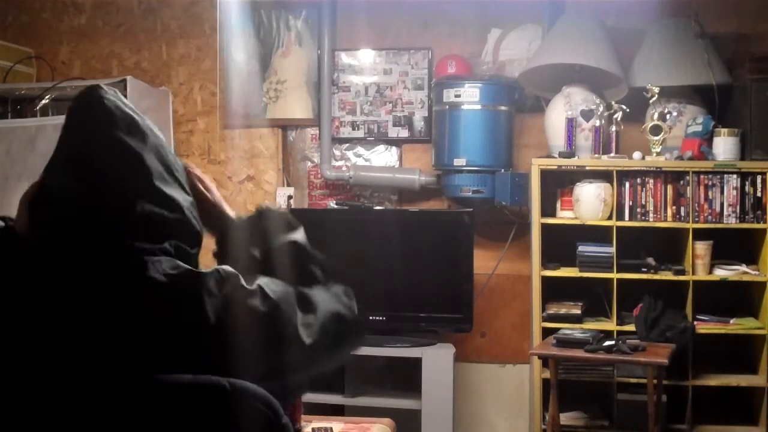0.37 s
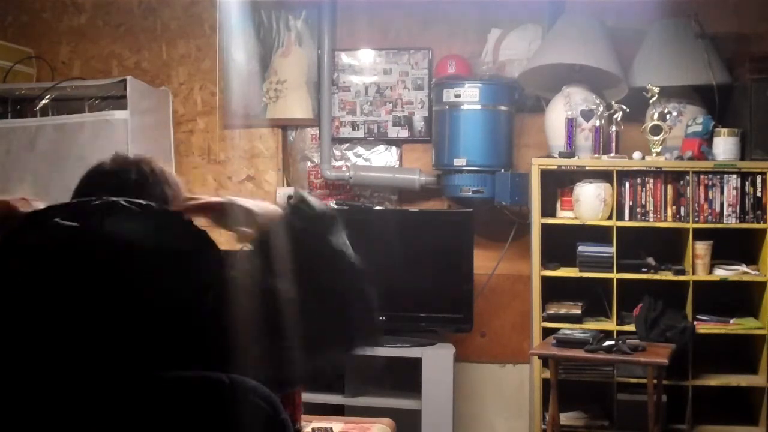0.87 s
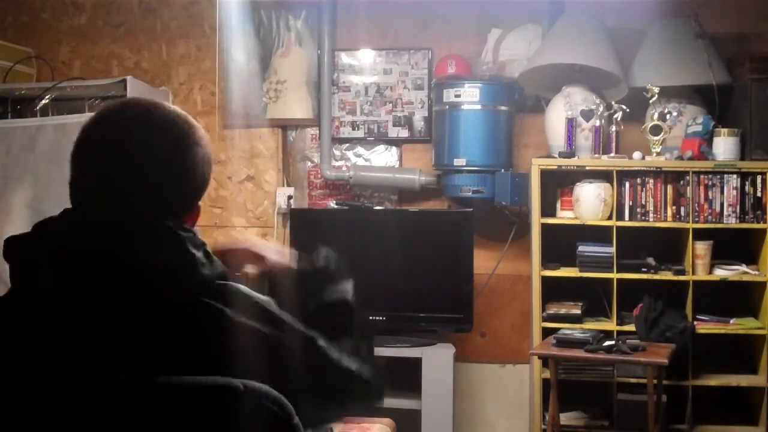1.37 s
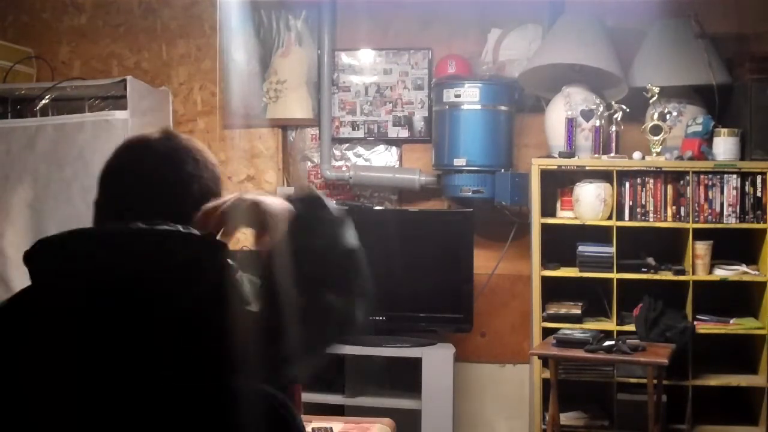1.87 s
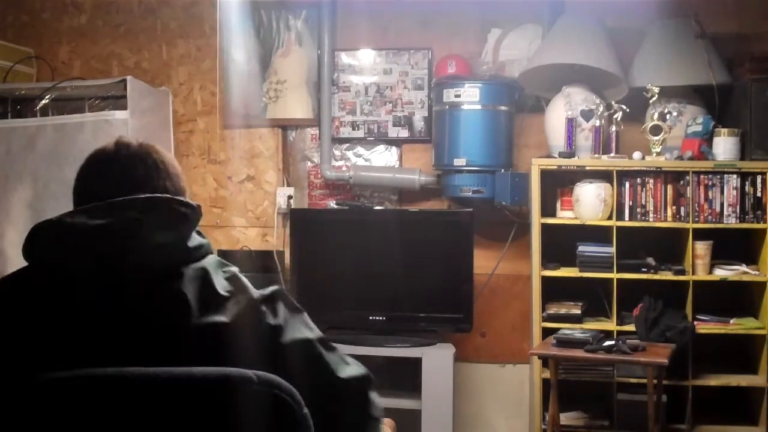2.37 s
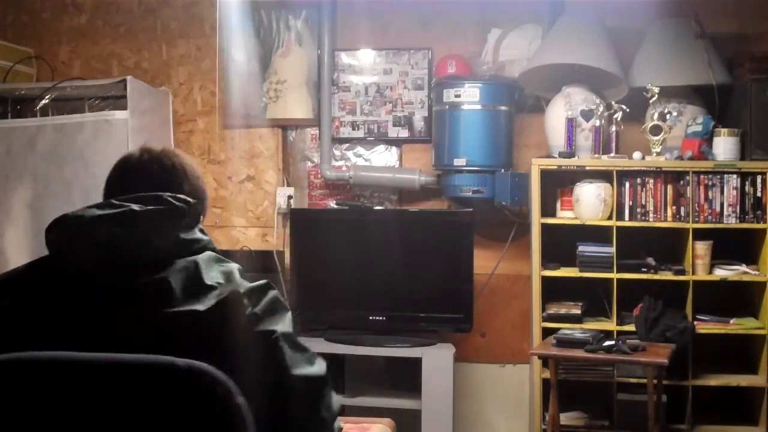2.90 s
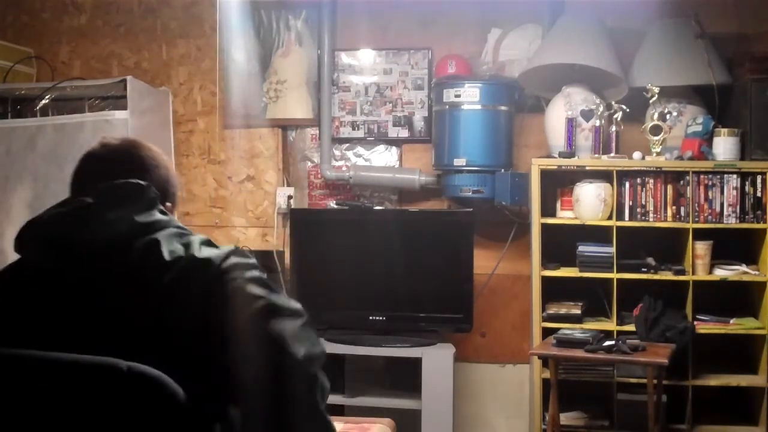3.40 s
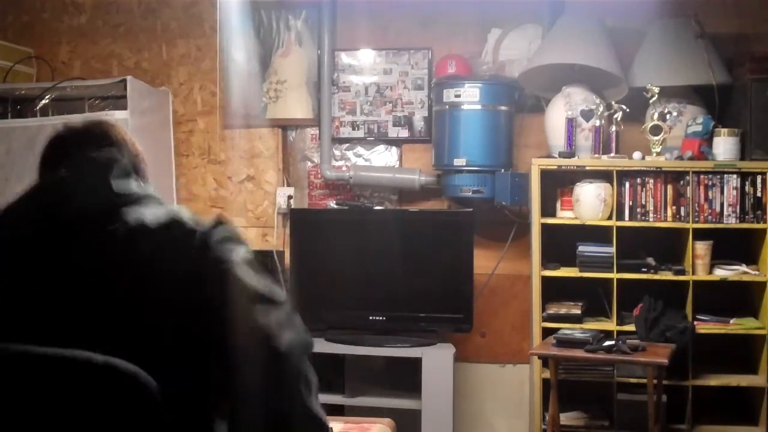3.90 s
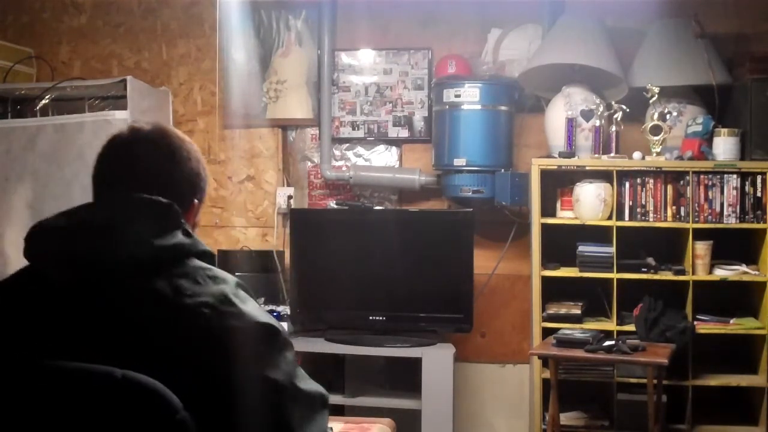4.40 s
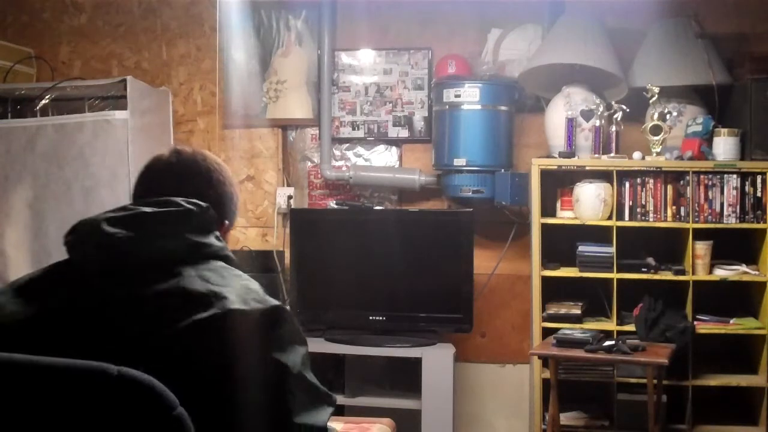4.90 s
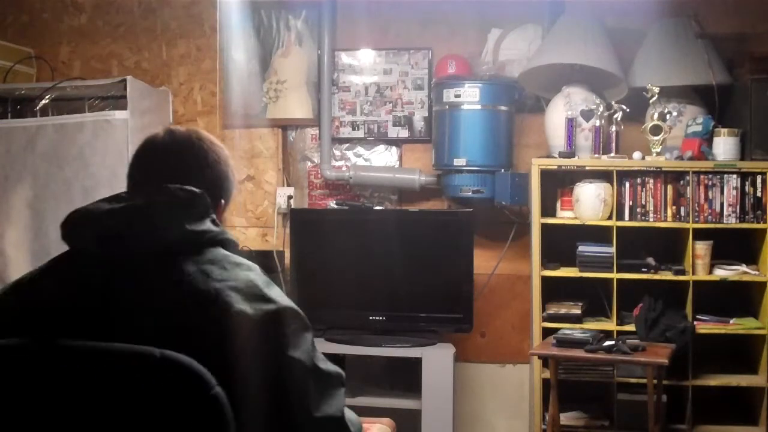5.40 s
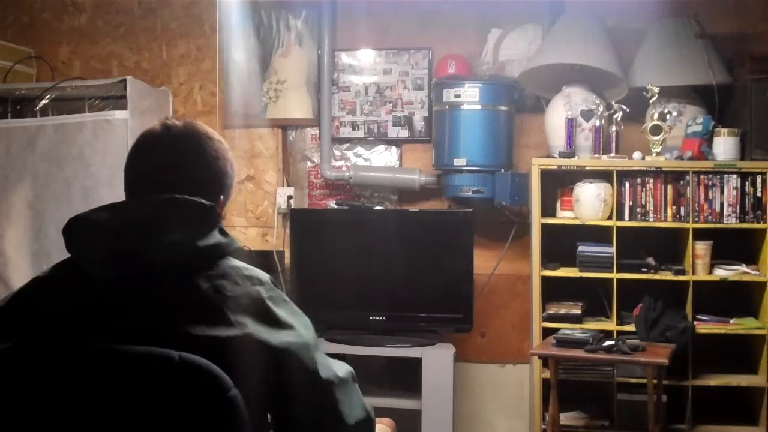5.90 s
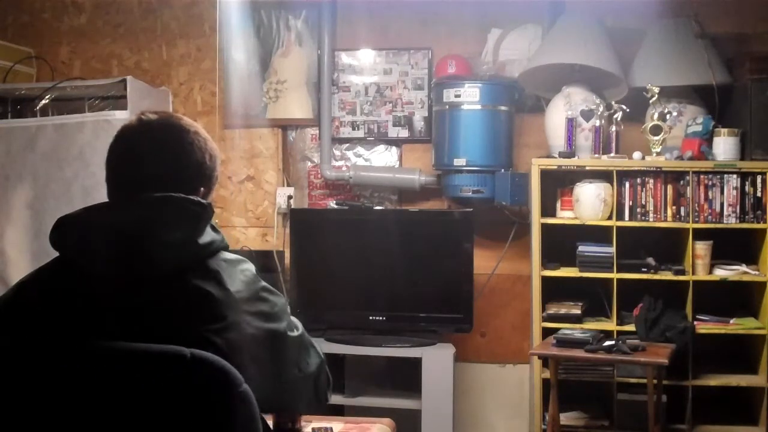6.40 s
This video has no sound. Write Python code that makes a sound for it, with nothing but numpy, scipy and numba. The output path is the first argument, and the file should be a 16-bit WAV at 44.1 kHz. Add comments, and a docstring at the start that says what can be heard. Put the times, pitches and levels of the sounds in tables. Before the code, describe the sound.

Crinkly jacket rustling in a small indoor room, then sharp plastic rattling and knocks, soft chair thumps, and quiet appliance hum underneath.

```python
"""A stiff nylon jacket swishes and crackles as a seated person shifts about in a small cluttered room:
filtered noise and dense clicks under movement curves, with scuffs, seam rasps and cloth snaps.
Hands stir small hollow plastic things: random blows and single knocks excite decaying modes.
The chair thumps: low resonances, short sine thuds and creaking boards in bands of clicks.
An appliance hums faintly in sine harmonics over the room air, which is coloured noise."""
import sys
import numpy as np
from scipy import signal
from scipy.fft import rfft, irfft
from scipy.io import wavfile
from scipy.ndimage import uniform_filter1d, map_coordinates
from numba import njit

SR = 44100
rng = np.random.default_rng(int(sys.argv[2]) if len(sys.argv) > 2 else 0)


def store_pcm(level_fs):
    """Save levels as 16-bit WAV."""
    pcm = np.round(np.clip(level_fs, -1, 1) * 32767).astype(np.int16)
    wavfile.write(sys.argv[1], SR, np.atleast_2d(pcm).T)


def gain_from_decibels(decibels):
    """Convert decibel values to linear amplitude factors."""
    exponent = np.asarray(decibels, float) / 20
    return 10 ** exponent


N = 287527
T = np.arange(N) / SR


def unit(x):
    """Scale to rms 1."""
    return x / np.sqrt(np.mean(x ** 2))


def colour(x, points):
    """Causal minimum-phase filter through (Hz, dB) points, by way of the cepstrum."""
    hz, db = np.transpose(points)
    bin_hz = np.arange(1025) * SR / 2048
    log_gain = np.interp(np.log(bin_hz + 1), np.log(hz), db) * np.log(10) / 20
    cepstrum = irfft(log_gain)
    causal = cepstrum[:1025] * np.r_[1, 2 * np.ones(1023), 1]
    impulse = irfft(np.exp(rfft(causal, 2048)))
    return signal.fftconvolve(x, impulse)[:len(x)]


def band(x, lo_hz, hi_hz):
    """Gentle band-pass."""
    return signal.sosfilt(signal.butter(2, [lo_hz, hi_hz], "band", fs=SR, output="sos"), x)


def walk(rate_hz):
    """Random levels held 1 / rate_hz seconds and slewed twice; spread near 1."""
    hold = int(SR / rate_hz)
    steps = np.repeat(rng.standard_normal(int(N / hold) + 1), hold)
    return 1.55 * uniform_filter1d(uniform_filter1d(steps, hold), hold)[:N]


def clicks(rate_hz, spread_db):
    """Scattered clicks of either sign, many weak and a few strong, scaled to rms 1."""
    when, strength, sign = rng.random((3, N))
    size = gain_from_decibels(-spread_db * np.log(1 - strength)) * np.sign(sign - .5)
    return unit(size * (when < rate_hz / SR))


def columns(spans):
    """Gate that is shut between spans, then each column of the spans as a curve in samples."""
    s, *rest = np.concatenate(spans).T
    inside = sum((T >= rows[0][0]) & (T <= rows[-1][0]) for rows in spans) > 0
    gate = uniform_filter1d(1. * inside, size=400)
    return [gate] + [np.interp(T, s, column) for column in rest]


def swells(s, db, rise_s_per_20db, fade_s_per_20db):
    """Envelope of events that rise to their peak and fade, each at a steady rate in dB."""
    power = np.zeros(N)
    for at, peak_db, fade in zip(s, db, np.clip(fade_s_per_20db, .005, 1)):
        near = slice(max(int((at - 3 * rise_s_per_20db) * SR), 0), int((at + 3 * fade) * SR))
        late = T[near] - at
        drop = np.where(late < 0, -late / rise_s_per_20db, late / fade)
        power[near] += gain_from_decibels(peak_db - 20 * drop) ** 2
    return np.sqrt(power)


def nearest(s, values):
    """Each moment takes the value of the nearest event."""
    return values[np.searchsorted((s[1:] + s[:-1]) / 2, T)]


@njit
def ring(x, hz, t60_s):
    """One decaying mode whose pitch may move."""
    y, z, decay = np.empty(len(x)), 0j, np.exp(-np.log(1000) / (t60_s * SR))
    for i in range(len(x)):
        z = z * decay * np.exp(2j * np.pi * hz[i] / SR) + x[i]
        y[i] = z.imag
    return y


# Gain of the side signal at the two ports. Each row: frequency in Hz, gain in dB.
SIDE_GAIN = [(30, 0), (100, -2.5), (500, -8), (2000, -4), (5000, -0.5), (10000, -1.5), (15000, 3)]


def all_round(mid, side):
    """Sound from every side: most alike at both ports around 500 Hz, less alike below and above."""
    side = colour(side, SIDE_GAIN)
    return np.array([mid + side, mid - side])


# Appliance harmonics. Each row: frequency in Hz, middle level in dB rms.
HUM = [(120, -73), (240, -79), (360.7, -62.5), (480, -81)]
# Spectrum shape of the room air. Each row: frequency in Hz, relative density in dB per Hz.
AIR = [(15, -13), (25, -8.5), (54, -14), (309, -9.5), (363, -7.5), (529, -10), (655, -8), (1060, -12),
       (1960, -10.5), (5420, -14), (10300, -27), (13100, -34.5), (15000, -38)]
AIR_DB = -47.5


def background():
    """Mains harmonics that waver a little, over faint room air."""
    hum = 0
    for hz, db in HUM:
        hum = hum + np.sqrt(2) * gain_from_decibels(db + 2.5 * walk(5)) * np.sin(2 * np.pi * (hz * T + rng.random()))
    mid, side = [colour(rng.standard_normal(N), AIR) for _ in range(2)]
    return hum + gain_from_decibels(AIR_DB) * unit(all_round(mid, side))


# Weight shifts on chair and floor. Each row: peak time in seconds, relative boom level in dB,
# boom pitch in Hz, relative level of creaking boards in dB, fade in seconds per 20 dB (held to .005-1).
WEIGHT = [(0.03, -60, 150, -42, 0), (1.51, -53, 85, -51, .08), (1.54, -40.5, 208, -50, 0.06),
          (1.57, -49, 106, -45, 0.2), (2.79, -46, 80.2, -40.5, 0.4), (2.868, -40.5, 115, -31.5, .12),
          (3.01, -56, 192, -30, -0.03), (3.134, -58, 160, -51, -0.1), (3.172, -62, 159, -42, -0.1),
          (3.34, -62, 150, -50, 0.2), (4.088, -64, 125.4, -51, 0.4), (4.685, -77, 140, -48, -0.05),
          (4.8, -71, 113, -46.5, -0.17), (5.244, -50, 90, -43.5, 0.1), (5.308, -44, 147.4, -38.5, 0),
          (5.376, -45, 158.5, -38, 0.3), (5.44, -51, 85, -50, .12), (5.504, -39, 147, -40, -0.15),
          (5.6, -51, 130, -49, 0), (5.64, -49, 48.2, -51, .1)]


def weight():
    """Soft shoves set the chair and the floor boards booming briefly; each thud sounds its own note."""
    rise_s_per_20db = 0.074
    s, boom_db, hz, boards_db, fade = np.transpose(WEIGHT)
    shoves = clicks(400, 0.92)
    pitch_hz = nearest(s, hz)
    boom = sum(ring(shoves, np.clip(share * pitch_hz, 30, 300), 0.1) for share in (.7, 1, 1.35))
    boom = unit(band(band(boom, 58, 360), 58, 340))
    boards = unit(band(clicks(600, 2.0), 224, 580))
    thuds = np.zeros(N)
    for at, db, f, fall, turn in zip(s, boom_db, hz, fade, rng.random(len(s))):
        thuds += swells([at], [db], rise_s_per_20db, [fall]) * np.sin(2 * np.pi * (f * T + turn))
    boom_level = swells(s, boom_db, rise_s_per_20db, fade)
    boards_level = swells(s, boards_db, rise_s_per_20db, fade)
    return boom_level * gain_from_decibels(-4.0) * boom + gain_from_decibels(-1.0) * thuds + boards_level * boards


# Low modes of the plastic. Each row: share of the main ring pitch, relative drive in dB, T60 in seconds.
LOW_RINGS = [(.57, -18, 0.033), (.82, -6.5, 0.026), (0.981, -1.5, 0.051), (1.031, -6.5, 0.046),
             (1.172, -7, 0.034)]
# Upper modes of the plastic. Each row: middle pitch in Hz, relative drive in dB, T60 in seconds.
UPPER_RINGS = [(2630, 10, 0.0083), (2946, 5, 0.011), (3420, -12, 0.06), (3520, -22, 0.037)]


def plastic(blows, upper_blows, hz):
    """Blows ring the modes of hollow plastic; each pitch wanders, as pieces differ a little."""
    low, upper = np.zeros(N), np.zeros(N)
    for share, db, t60_s in LOW_RINGS:
        low += gain_from_decibels(db) * ring(blows, share * hz * (1 + 0.0071 * walk(40)), t60_s)
    for f, db, t60_s in UPPER_RINGS:
        upper += gain_from_decibels(db) * ring(upper_blows, f * (1 + 0.012 * walk(40)), t60_s)
    # the rings carry no bass, and the contact is too long for much treble
    return band(low, 990, 5700), band(upper, 3020, 4800)


# Handfuls being stirred, one list of rows per stir. Each row: time in seconds,
# relative rattle level in dB, upper rings over the rattle in dB.
STIRS = [
    [(1.6, -44, 2), (1.692, -44, -5), (1.696, -43, -1), (1.78, -55, -1)],
    [(2.72, -53, 1), (2.772, -25, -9.5), (2.83, -20.5, -4.5), (2.844, -17.5, -11), (2.976, -28, -4.5),
     (2.986, -19, -8.5), (3.0, -21.5, -4)],
    [(3.0, -21.5, -10), (3.028, -26.5, -7), (3.124, -35, -6), (3.144, -29, -4.5), (3.174, -31.5, -3),
     (3.184, -31, -9), (3.25, -47, -2)],
    [(3.86, -71, 2), (3.884, -40, -10), (3.986, -36.5, -3), (3.996, -29, -11), (4.034, -39, -7),
     (4.064, -35, -17), (4.15, -60, -3)],
    [(4.15, -58, 3), (4.218, -45, 5.5), (4.302, -55, 1), (4.37, -42, -6), (4.426, -60, 2), (4.508, -50, -6),
     (4.55, -67, -3)],
    [(4.84, -72, -2), (4.874, -51, 0), (4.922, -50, -1), (4.97, -45, -6), (4.978, -28.5, -11),
     (5.016, -42, -5), (5.14, -64, -1)],
    [(5.15, -72, 11), (5.174, -37.5, -8.5), (5.31, -28, -4), (5.316, -24, -5), (5.436, -31.5, -3),
     (5.486, -29, -2), (5.5, -37, -4)],
    [(5.5, -33.5, -7), (5.648, -46, -1), (5.656, -40, -9), (5.708, -51, -3), (5.732, -43, -17),
     (5.814, -51, -18), (5.86, -72, 4)],
]


def rattle():
    """Pieces tumble against each other in uneven clusters; the pitch leans to the pieces that knock."""
    main_hz, lean, wander = 1830, .4, .03
    gate, db, upper_db = columns(STIRS)
    s, _, knock_hz, *_ = np.transpose(KNOCKS)
    blows = clicks(2300, 2.04) * gain_from_decibels(2.23 * walk(80))
    hz = main_hz + lean * (np.interp(T, s, knock_hz) - main_hz)
    low, upper = plastic(blows, blows, hz * (1 + wander * walk(15)))
    return gate * gain_from_decibels(db + 0.5) * (unit(low) + gain_from_decibels(upper_db) * unit(upper))


# Single knocks. Each row: start in seconds, relative level in dB, main ring pitch in Hz,
# upper rings over that level in dB, bright crack over that level in dB.
KNOCKS = [(2.7485, -17, 1910, -16, -18), (2.778, -11.5, 1910, -20, -13), (2.8052, -9.5, 1730, -8, -13),
          (2.8436, -3, 1923, -2.5, -34), (2.8522, -1, 2140, -10, -36), (2.8643, -1, 2017, -6.5, -40),
          (2.8712, -8, 2090, -23, -35), (2.8899, -9.5, 2040, -4, -40), (2.9096, -21, 1640, -19, -35),
          (2.9383, -12.5, 1860, -2, -16), (2.9591, -12, 1700, -7, -25), (2.9849, -7, 1980, -3.5, -38),
          (2.9965, -12, 1840, -26.5, -17), (3.0364, -16, 1730, -22, -23), (3.0982, -17.5, 2164, -8, -12),
          (3.136, -17.5, 1790, -11, -3.5), (3.1666, -16, 1640, -10, -2.5), (3.255, -29, 1780, 1, -8),
          (3.8846, -29, 1780, -6, -14), (3.928, -18.5, 2110, -14, -16.5), (3.9921, -17.5, 1597, -14, -25),
          (4.0499, -11, 2000, -20, -13), (4.0689, -22, 1710, -10, -22), (4.1942, -26, 2230, -2, -3.5),
          (4.353, -28.5, 1730, -9, -5), (4.4555, -34, 1840, -15, -5), (4.5076, -29, 2020, -6, -23),
          (4.871, -31, 2180, -14, -9), (4.8948, -32, 2480, -17, -10), (4.95, -29, 1920, -17, -3),
          (4.9769, -10.5, 1858, -15, -15.5), (4.9947, -24, 1820, -20, -29), (5.0883, -35.5, 1720, 5, -15),
          (5.1752, -22.5, 1730, -17, -27), (5.226, -19.5, 1740, -5, -14), (5.253, -12, 1870, -13, -14.5),
          (5.3172, -9, 1824, -2.5, -12.5), (5.338, -12.5, 1756, -20, -20), (5.362, -12, 2200, -6, -25),
          (5.391, -17, 1774, -2, -20), (5.415, -16, 1720, 1.5, -12), (5.455, -13, 1830, -7, -15),
          (5.4855, -14.5, 1710, -13, -6), (5.5247, -17.5, 1700, -4, -10), (5.729, -21, 1590, -14, -24)]


def knocks():
    """Each knock is a firm contact and a short chatter that ring the plastic, with a bright crack."""
    chatter_s, length = 0.0042, 1200
    s, db, hz, upper_db, crack_db = np.transpose(KNOCKS)
    blows = np.zeros((3, N))  # low rings, upper rings, crack
    contacts = rng.standard_normal((len(s), 3, length))
    sizes = gain_from_decibels(db + np.array([0 * db - 3.5, upper_db - 0.5, crack_db + 1.5])).T
    fade = np.exp(-T[:length] / chatter_s)
    chatter = 0.69 * fade / np.sqrt(np.sum(fade ** 2))
    for at, size, contact in zip((s * SR).astype(int), sizes, contacts):
        blows[:, at:at + length] += size[:, None] * contact * [chatter, chatter, np.sqrt(fade)]
        blows[:2, at] += 0.36 * size[:2]  # firm contact
    latest = np.maximum(np.searchsorted(s, T) - 1, 0)
    low, upper = plastic(blows[0], blows[1], hz[latest])
    return low + upper + band(blows[2], 1960, 10300)


# Dry snaps of the stiff cloth. Each row: start in seconds, relative level in dB, centre in Hz.
SNAPS = [(0.522, -28, 3120), (0.761, -26, 2250), (0.808, -23.5, 1690), (0.852, -26, 1040),
         (0.867, -39, 2290), (0.901, -17, 3530), (1.132, -27, 2020), (1.555, -15, 2280), (1.562, -28, 1080),
         (1.811, -25.5, 1820), (2.134, -30.5, 1770), (3.532, -25, 2110), (3.695, -35, 1240),
         (6.004, -33, 1280)]


def snaps():
    """A crease flips over: one broad click about a cycle long."""
    out = np.zeros(N)
    for s, db, hz in SNAPS:
        at = int(s * SR)
        out[at:at + 300] += gain_from_decibels(db) * np.sin(2 * np.pi * hz * T[:300]) * np.exp(-hz * T[:300] / 0.92)
    return 2 * band(out, 450, 12000)


# A sleeve scuffs heavily. Each row: peak time in seconds, relative level in dB,
# fade in seconds per 20 dB (held to .005-1), centre in Hz.
SCUFFS = [(0.005, -39, 0.12, 800), (0.06, -44, -0.06, 850), (0.86, -41.5, 0.26, 750),
          (1.095, -44, .04, 700), (1.134, -39.5, 0.07, 750), (1.562, -44, .06, 1050), (1.81, -51, 0.8, 740),
          (2.786, -31.5, 0.07, 906), (2.856, -31.5, 0.1, 900), (3.002, -33.5, 0.16, 650),
          (3.138, -34, .04, 900), (3.17, -32, 0.11, 500), (3.26, -48, 0.2, 800), (3.404, -47, 0.26, 1000),
          (3.696, -53, -0.1, 650), (3.928, -37.5, 0.07, 1010), (3.992, -41, 0.12, 950), (4.05, -33, 0, 900),
          (4.21, -51.5, -0.65, 790), (4.66, -48, .1, 600), (4.98, -45, 0.2, 750), (5.16, -50, 0.3, 950),
          (5.26, -33.5, 0.02, 950), (5.318, -33.5, .12, 750), (5.45, -39.5, 0.1, 1110),
          (5.546, -34.5, 0.13, 700), (5.74, -36, 0, 800), (6.008, -51, -0.3, 1000)]


def scuffs(rub):
    """The dragged sleeve resonates, low and heavily damped, under the rubbing."""
    s, db, fade, hz = np.transpose(SCUFFS)
    centre_hz = nearest(s, hz)
    drag = band([ring(row, centre_hz, 0.0045) for row in rub], 327, 2500)
    return unit(drag) * swells(s, db, 0.02, fade)


# Movement of the jacket, one list of rows per movement. Each row: time in seconds, relative level in dB.
JACKET = [
    [(0.0, -48.5), (0.046, -54), (0.07, -65.5), (0.292, -50), (0.448, -61), (0.454, -52), (0.518, -46.5),
     (0.6, -51)],
    [(0.6, -49), (0.718, -43), (0.796, -48.5), (0.874, -37.5), (0.994, -48.5), (1.12, -46.5),
     (1.238, -49.5), (1.35, -67)],
    [(1.35, -73), (1.39, -50), (1.598, -38.5), (1.664, -45), (1.856, -41), (1.868, -45.5), (2.462, -51.5),
     (2.7, -49)],
    [(2.7, -54.5), (2.852, -33), (2.93, -43.5), (2.938, -33), (3.118, -48), (3.168, -36), (3.22, -46.5),
     (3.3, -44.5)],
    [(3.3, -44), (3.372, -51.5), (3.428, -46.5), (3.44, -51.5), (3.54, -49), (3.702, -53.5), (3.744, -46.5),
     (3.86, -61)],
    [(3.86, -60), (3.944, -44.5), (3.986, -49.5), (4.058, -39), (4.094, -45.5), (4.292, -42.5),
     (4.454, -47.5), (4.58, -71)],
    [(4.75, -80), (4.912, -51), (4.928, -62), (4.982, -45), (4.992, -52), (5.072, -65), (5.086, -50),
     (5.16, -69)],
    [(5.16, -69), (5.186, -52), (5.316, -38), (5.412, -41), (5.536, -37.5), (5.658, -53), (5.7, -46.5),
     (5.82, -77)],
    [(5.82, -68), (5.94, -51.5), (6.05, -50), (6.14, -69), (6.148, -56), (6.266, -54.5), (6.302, -64),
     (6.4, -69)],
]
# Spectrum shape of the rubbing cloth. Each row: frequency in Hz, relative density in dB per Hz.
SWISH = [(590, -39), (1000, -5), (2900, -5.5), (3400, -6), (8610, -7.5), (10100, -8), (13500, -20.5),
         (14500, -6), (15000, -47)]
# A seam rasps brightly. Each row: peak time in seconds, relative level in dB,
# fade in seconds per 20 dB (held to .005-1).
RASPS = [(0.282, -49, 0.3), (1.44, -38.5, -0.6), (1.56, -42, 0.25), (1.924, -48.5, .1), (2.34, -41, 0.09),
         (2.786, -41, 3), (3.138, -36, -0.17), (3.168, -34, 0.03), (4.048, -35, .08), (4.21, -33.5, -0.01),
         (4.798, -50, .03), (4.98, -42.5, 0.12), (5.266, -39, 0.2), (5.318, -36, 0.36), (5.547, -31, -0.03),
         (5.716, -43, -0.08), (5.99, -47, 0.17), (6.268, -47, -0.8)]


def jacket():
    """Stiff cloth rubs in a hiss and buckles in dense tiny crackles; rows: its middle, its far-apart edges."""
    swish_db, folds_db, crisp_db = 6.5, -9.5, -9.5  # against the movement curve
    gate, moving_db = columns(JACKET)
    s, db, fade = np.transpose(RASPS)
    rasps = swells(s, db, 0.02, fade)
    rub = rng.standard_normal((2, N)) + 0.42 * clicks(2500, 2.34)
    bright = np.array([colour(row, SWISH) for row in rub])
    flicker_db = 1.41 * walk(60)

    swish_level = np.hypot(gate * gain_from_decibels(moving_db + swish_db), gain_from_decibels(1.5) * rasps)
    swish = unit(band(bright, 1530, 8100)) * gain_from_decibels(flicker_db) * swish_level
    folds = unit(band(rub, 467, 1240)) * gain_from_decibels(1.3 * walk(40)) * gate * gain_from_decibels(moving_db + folds_db)
    crisp_level = np.hypot(gate * gain_from_decibels(moving_db + crisp_db), rasps)
    crisp = unit(band(bright, 6180, 13100)) * gain_from_decibels(flicker_db + 1.3 * walk(50)) * crisp_level
    return swish + folds + crisp + scuffs(rub)


def room(x):
    """Direct sound reaches the left port first; a dense tail follows, its treble dying sooner."""
    t60_s, treble_t60_s, tail_db, treble_db = 0.37, 0.19, -10.5, -0.5
    port_lag_s = 2.5e-5
    t = T[:SR // 2]
    noise = rng.standard_normal((2, len(t)))
    low = signal.sosfilt(signal.butter(1, 2500, fs=SR, output="sos"), noise)
    tail = low * gain_from_decibels(-60 * t / t60_s) + (noise - low) * gain_from_decibels(treble_db - 60 * t / treble_t60_s)
    tail = tail * np.clip((t - .003) / 0.013, 0, 1)
    tail = all_round(*tail) / np.sqrt(np.sum(tail[0] ** 2))
    shift = np.array([[.5], [-.5]]) * port_lag_s * SR
    direct = map_coordinates(x, [np.arange(N) + shift], order=3)
    return direct + gain_from_decibels(tail_db) * signal.fftconvolve(x[None], tail, axes=1)[:, :N]


def scene():
    """Everything near the chair sounds through the room; the jacket is a wide source."""
    cloth, edges = gain_from_decibels(-2.5) * jacket()
    near = cloth + gain_from_decibels(-2.0) * (snaps() + rattle() + knocks() + weight())
    return room(near) + gain_from_decibels(-9.5) * all_round(0, edges) + background()


def roll_off(x):
    """The treble ends steeply here."""
    return signal.sosfilt(signal.butter(12, 15500, fs=SR, output="sos"), x)


def record(dry):
    """Loud peaks are rounded, the top is cut, the left port is more sensitive, zero sits slightly off."""
    top_hz, left_over_right_db, dc_offset = 14300, 0.5, -.0008
    cut = signal.sosfilt(signal.butter(8, top_hz, fs=SR, output="sos"), np.tanh(dry))
    port_gain = gain_from_decibels(np.array([[left_over_right_db], [-left_over_right_db]]) / 2)
    return roll_off(cut * port_gain + dc_offset)


dry = scene()
out = record(dry)
store_pcm(out)
```